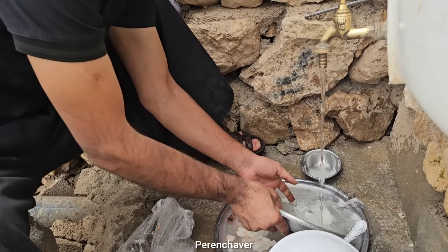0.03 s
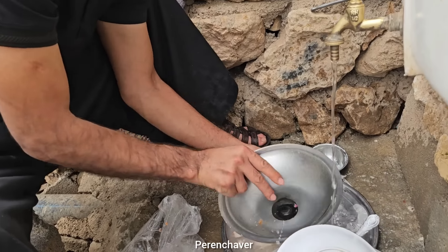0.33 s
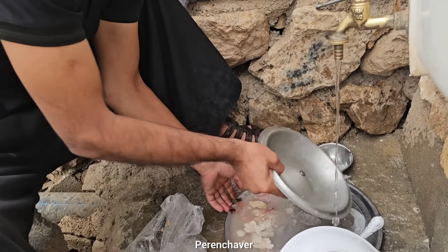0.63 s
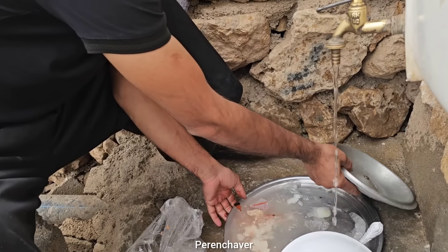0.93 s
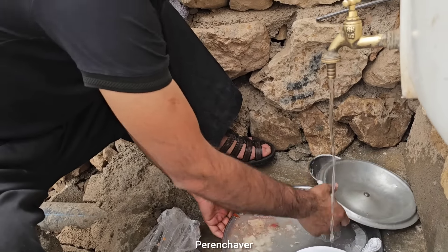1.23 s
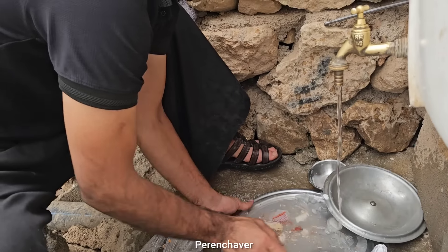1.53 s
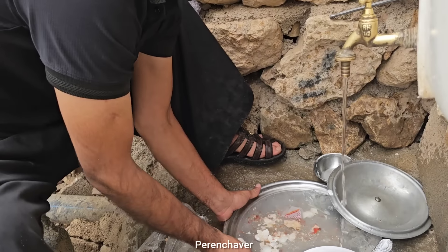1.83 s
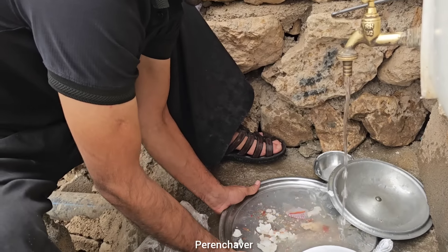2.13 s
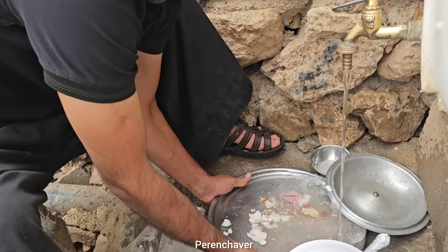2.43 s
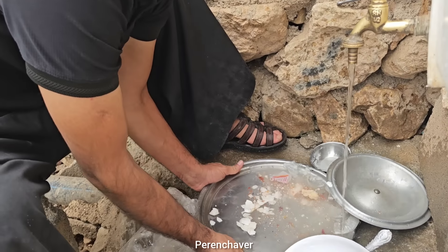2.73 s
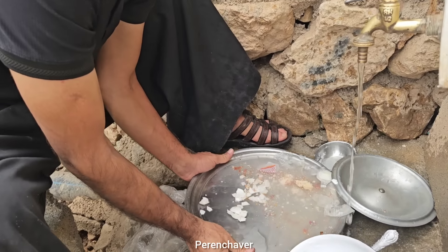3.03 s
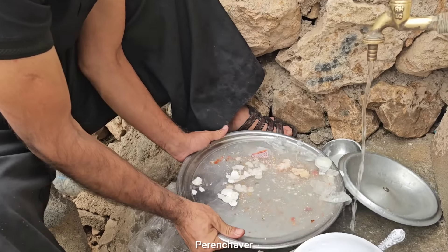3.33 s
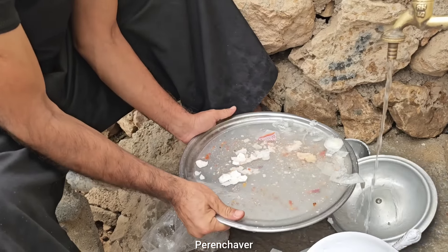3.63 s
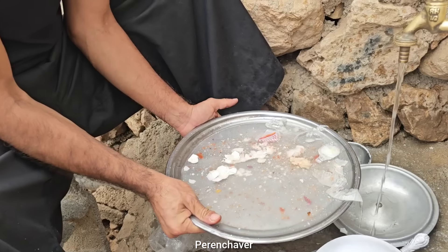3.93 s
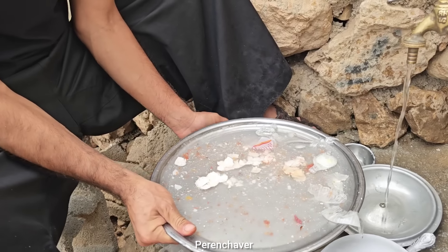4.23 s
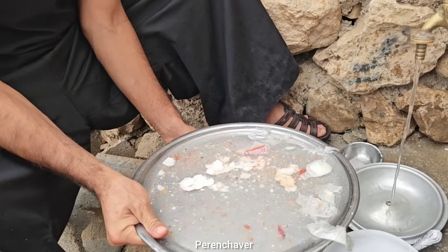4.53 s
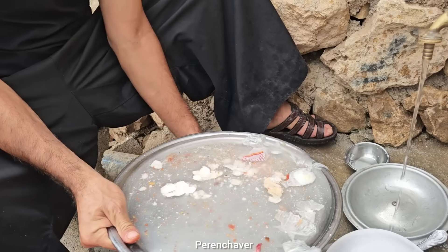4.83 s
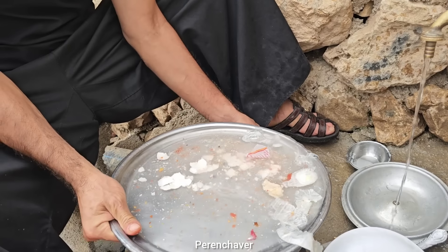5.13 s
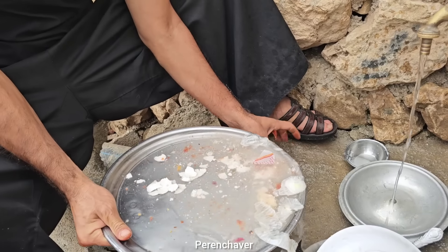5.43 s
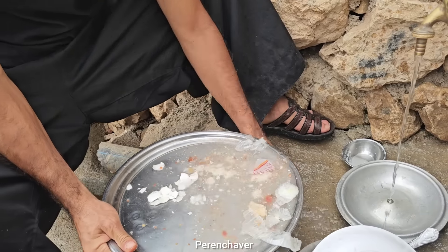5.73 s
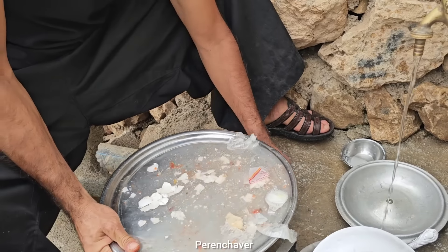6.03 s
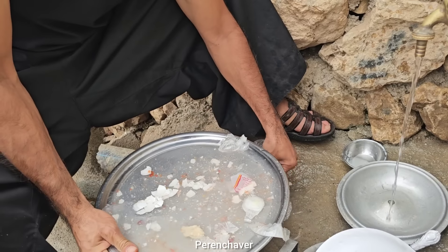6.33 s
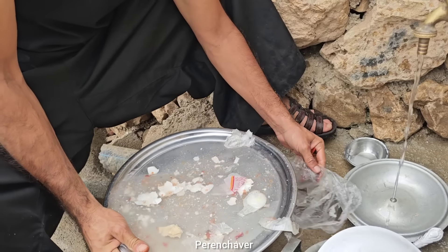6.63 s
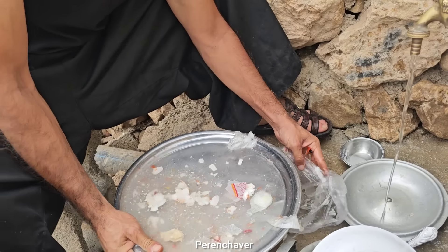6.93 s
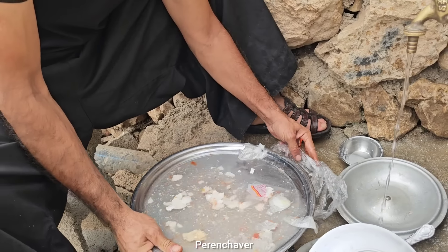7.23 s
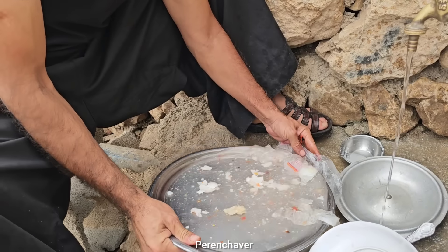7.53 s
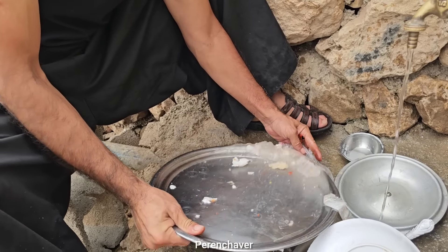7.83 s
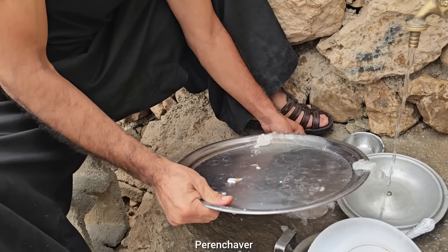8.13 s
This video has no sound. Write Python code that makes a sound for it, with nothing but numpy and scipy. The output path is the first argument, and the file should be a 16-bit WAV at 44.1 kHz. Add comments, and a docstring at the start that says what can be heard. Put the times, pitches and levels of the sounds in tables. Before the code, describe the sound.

Water sloshes and gurgles in a steel bowl swilled by hand. The bowl clatters against a basin, its wet rim is briefly rubbed, then it is set down with a loud ringing clank and dragged over gritty concrete. A tap dribbles and runs in a thin splattering stream, with scattered drops and a few dull plastic thuds. The sound is close and outdoors, with a short echo from stone walls.

```python
"""Rinsing a steel bowl outdoors

Water sloshes and bubbles in a steel bowl swilled by hand. The bowl rings as it knocks against a basin,
sings as its wet rim is rubbed, and is set down and dragged over gritty concrete. Drops fall, the tap
dribbles and runs in a thin splattering stream, and a plastic vessel is bumped with a dull thud.
Stone walls close by add a short echo, over a faint outdoor rumble."""
import sys
import numpy as np
from scipy import signal
from scipy.fft import irfft
from scipy.io import wavfile
from scipy.ndimage import uniform_filter1d

SR = 44100
rng = np.random.default_rng(int(sys.argv[2]) if len(sys.argv) > 2 else 0)


def generate_wav(signal):
    """Clip the signal to [-1, 1] and save it as 16-bit WAV at the path in sys.argv[1]."""
    frames = np.transpose(np.atleast_2d(signal))
    scaled = np.clip(frames, -1, 1) * 32767
    pcm = np.round(scaled).astype(np.int16)
    wavfile.write(sys.argv[1], SR, pcm)


N = 360738
TIME = np.arange(N) / SR

# how much louder the left side is: (frequency [Hz], left minus right [dB])
SIDE_BALANCE = [(200, -0.5), (1300, 1), (2000, 3), (3000, -5.5), (4200, -8.5), (5500, 3.5), (7500, 5.5),
                (8800, 15.5), (11000, 2.5), (13000, 9), (16000, 11.5)]
# how far the two sides fall out of step: (frequency [Hz], typical phase shift [radians])
SIDE_PHASE = [(100, .04), (500, .17), (1300, .5), (3000, 1.1), (15000, 1.4)]
# tone of the outdoor air: (frequency [Hz], level [dB])
AIR_TONE = [(20, -16), (48, 5), (125, -2.5), (200, -11), (400, -18), (600, -25.5), (1300, -18), (2100, -23),
            (8000, -37), (16000, -37)]
# rumbles as the body and the basin shift: (time [s], hold [s], level [dB])
SHIFTS = [(1.0, 0.18, -44), (3.27, 0.2303, -42.5), (3.9, 0.026, -48.5)]
# bumps on the plastic vessel: (time [s], level [dB], pitch [factor])
BUMPS = [(0.948, -28, 0.44), (1.235, -31, 1.14), (2.665, -38.5, 0.54), (2.696, -28, 1.3),
         (2.817, -36, 1.44), (2.957, -32.5, 0.92), (3.09, -39, 0.95), (7.241, -38.5, 1.2465),
         (7.597, -28, 0.99), (7.723, -33, 0.97), (7.769, -40, 1.01)]
# its modes, the tones it rings at: (pitch [Hz], level [dB], t60 [s]); t60 is the time to fade by 60 dB
PLASTIC_MODES = [(265.5, -4, 0.078), (396, -7, 0.08), (554, -0.5, 0.034), (682.7, 7.5, 0.082),
                 (823, -3.5, 0.072), (1025, 6, 0.04), (1242, -3, 0.057)]
# drops on wet metal: (time [s], level [dB], pitch that the chirp sweeps through [Hz])
DROPS = [(0.244, -40, 4070), (0.385, -40.5, 2670), (.533, -37, 2640), (0.638, -40.5, 3170),
         (1.634, -29.5, 2950), (1.75, -34, 2860), (1.857, -33, 1180), (2.071, -34.5, 3163),
         (4.316, -45, 2266), (4.465, -36, 2160), (4.606, -47, 3690), (4.654, -41.5, 3050),
         (5.001, -31.5, 1780), (5.183, -39, 2880), (5.347, -47, 3010), (5.615, -38.5, 2730),
         (5.746, -49, 5450), (5.874, -35.5, 1960), (6.361, -41, 1910), (6.532, -39, 2980),
         (6.812, -48, 2360), (6.936, -43, 2710), (7.237, -31.5, 2054), (7.493, -28, 1684),
         (7.934, -35, 2350), (8.103, -44, 2970), (8.126, -41, 3200)]
# large air bubbles: (time [s], level [dB], pitch [Hz], t60 [s])
GLUGS = [(.405, -29, 1410, 0.037), (.668, -38, 302, 0.21), (1.83, -30, 1080, 0.0423),
         (2.106, -25, 694, 0.024), (7.132, -34.5, 195.8, 0.09)]
# runs of the tap: (time [s], hold [s], level [dB])
TAP_RUNS = [(4.15, .1, -61), (4.83, .65, -48.3), (5.5, 1.38, -45.5), (7.28, .17, -51), (7.62, .55, -41.7)]
# tone of the stream: (frequency [Hz], level [dB])
STREAM_TONE = [(150, -8), (300, -7.5), (600, -10), (950, -13.5), (1350, -5), (2300, -8.5), (3500, 0),
               (4700, -3.5), (6000, -11), (9000, -15.5), (15500, -18.5)]
# sloshes in the bowl: (time [s], time to fade by 20 dB [s], gurgle [dB], hum of the bowl's wall [dB])
SLOSHES = [(-.02, 0.38, -34, -32), (0.437, 0.22, -40, -61), (1.221, .5, -42, -34.5),
           (1.537, 1.38, -43, -58), (1.796, 0.4, -39, -58), (2.0, 1.14, -40.5, -74.5),
           (2.3, 0.293, -37.5, -39), (2.8, 0.4, -47.5, -74), (3.275, 0.13, -38, -53)]
# gentle lapping between sloshes: (time [s], hold [s], level [dB])
LAPPING = (0, 4, -52.5)
# tone of the swilled water: (frequency [Hz], level [dB])
SWILL_TONE = [(100, -21), (250, -3), (550, 3.5), (800, -2), (1400, 3), (2300, -6), (4000, -6.5),
              (6000, -20.5), (9000, -27), (15500, -25.5)]
# places to strike the bowl, by name: (favoured pitch [Hz], its boost [dB], pitch bend by water [share])
PLACES = {"wall": (1300, 1.2, 0.0025), "flank": (1180, 7.6, .016), "foot": (770, 12, 0.0013),
          "base": (1800, 9.1, .003), "rim": (3050, 4, 0.0027)}
# the bowl's modes: (pitch [Hz], level [dB], t60 [s], left minus right [dB], places that wake it fully)
BOWL_MODES = [(673, -13, .2, 1, "wall foot"), (943, 1, .24, 7, "wall foot base"), (972, 0, .35, 3, "flank"),
              (1098, -15, .35, 2, "rim"), (1238, -8, .22, 1, "wall flank"), (1590, -16, .35, 1, "base rim"),
              (1707, -10, .32, 2, "wall base rim"), (1772, -17, .16, 2, "base flank"),
              (1900, -9, .2, 2, "wall"), (2285, -14, .25, -2, "base"),
              (2385, -15, .4, -3, "wall flank base rim"), (2455, -13, .45, -2, "base rim"),
              (2492, -3, .25, -2, "foot"), (2875, -11, .17, -7, "wall foot rim"),
              (3068, -7, .19, -6, "wall flank foot rim"), (3745, -12, .25, -4, "wall rim"),
              (3940, -11, .18, -7, "wall"), (4194, -17, .35, -4, "flank foot base"),
              (4622, -14, .2, -2, "wall rim"), (4945, -14, .17, 0, "wall"), (5650, -17, .2, 8, "wall foot"),
              (5850, -16, .2, 6, "foot"), (6660, -19, .2, 5, "foot rim"),
              (7720, -19, .13, 7, "wall foot rim")]
# clatter, the crowd of weak, short modes in bowl and basin: (frequency [Hz], level [dB])
CLATTER_TONE = [(60, -24), (150, -15), (300, -4.5), (550, -3.5), (950, 4.5), (1350, 4.5), (1750, 4.5),
                (1950, -7.5), (2200, -4), (2430, 3.5), (2680, -10.5), (3030, 4), (3400, -3.5), (3900, 1),
                (4600, -8), (5250, -10.5), (9000, -14), (16000, -16.5)]
# how long undamped clatter lasts: (frequency [Hz], t60 [s])
CLATTER_T60 = [(100, 0.71), (900, 0.2), (4000, 0.17), (15000, 0.077)]
# modes that ring on while the bowl stands free, and a ring of the basin under the stream: (time [s], end [s],
# pitch [Hz], level [dB], t60 [s])
LINGERING_MODES = [(3.478, 3.915, 431, -26.5, 1.4), (4.33, 5.0, 1098, -60, 2.5), (5.5, 5.9, 1200, -61, 3),
                   (6.55, 6.78, 4716, -51.5, 3)]
# the rub round the wet rim: (time [s], rise [s], time to fade by 20 dB [s])
RUB = (2.34, .15, .36)
# tones of the rubbed rim: (pitch [Hz], level [dB])
RUB_MODES = [(1350, -2), (1600, -2), (1700, -1), (1970, -5), (3050, -10), (3240, -4), (4130, -8),
             (5360, -13)]
# strokes over grit: (time [s], hold [s], low grind before trim [dB], high rasp before trim [dB], place)
DRAGS = [(1.04, 0.025, -33.5, -37, "wall"), (1.209, 0.17, -33, -34, "flank"),
         (3.52, 0.27, -35, -49.5, "base"), (3.897, 0.042, -34.5, -29, "rim")]
# blows on the bowl: (time [s], level [dB], treble tilt [dB per octave], ring over clatter [dB],
# damping by the hand [factor on the modes' t60], rattle [s], place)
KNOCKS = [(0.948, -20.5, 7, 0, 0.44, .003, "wall"), (.986, -14, -1, -3.5, 0.83, .0015, "wall"),
          (1.011, -20.5, 3.5, 2.5, 1, 0.0026, "wall"), (1.029, -23.5, -3.5, -4, 1, 0.0046, "wall"),
          (1.156, -25.5, -4, 2, 0.18, 0.0026, "wall"), (1.215, -25.5, -1, -9, 0.47, 0.0089, "flank"),
          (1.242, -18, -1.5, 7, 0.26, 0.0023, "flank"), (1.289, -22.5, -1.5, -12, 0.36, 0.0029, "flank"),
          (1.302, -24.5, -3.5, 8, 0.92, 0.001, "flank"), (1.361, -29, -1, -11, 0.63, 0.0015, "flank"),
          (2.316, -38, 3.5, 5, 0.18, .003, "wall"), (2.474, -35, 1, -8, 0.53, 0.0023, "base"),
          (3.295, -39, 9, -1, .8, 0.0037, "rim"), (3.398, -27, -6.5, -2.5, 1, 0.00035, "foot"),
          (3.425, -27.5, 6, -15, 0.71, 0.0098, "wall"), (3.438, -17.5, -5, 3, 0.2, .0026, "base"),
          (3.441, -15, 2, -5, 0.81, 0.0051, "base"), (3.4773, -9, -0.5, 4.5, 0.6, 0.0007, "foot"),
          (3.5164, -19.5, -3.5, -9, 0.17, 0.0018, "base"), (3.585, -32, -4.5, -11, 0.33, 0.0012, "base"),
          (3.631, -31.5, -6, -13, .3, 0.00068, "base"), (3.677, -25.5, -1.5, 0, 0.54, .0097, "rim"),
          (3.723, -23, 2, 3, 0.85, 0.0074, "rim"), (3.793, -27, 1, 2.5, 0.97, 0.0056, "rim"),
          (3.916, -28, 1.5, 1, 0.93, 0.01, "rim"), (3.947, -21, 8, 6.5, 0.61, 0.0064, "rim"),
          (4.096, -39.5, -1, -4.5, 0.68, 0.0049, "flank"), (7.599, -38, 7, 4, 0.23, .002, "rim"),
          (7.618, -44, 10, 8, .25, 0.0022, "wall")]


def amp(db):
    """Turns decibels into a gain."""
    return 10 ** (np.asarray(db) / 20)


def unit_level(x):
    """Scales a sound to an average power of one."""
    return x / np.sqrt(np.mean(x ** 2) + 1e-20)


def look_up(points, hz):
    """Joins a table's points by straight lines on a log-frequency axis."""
    table_hz, value = np.transpose(points)
    return np.interp(np.log(hz + 1), np.log(table_hz + 1), value)


def add(mix, start, sound):
    """Mixes a sound in, start seconds from the beginning."""
    part = mix[..., max(round(start * SR), 0):][..., :sound.shape[-1]]
    part += sound[..., :part.shape[-1]]


def coloured(x, tone):
    """Gives a sound a tone. Nothing rings ahead of a hit, so hits stay sharp."""
    log_gain = np.log(amp(look_up(tone, abs(np.fft.fftfreq(2048, 1 / SR)))))
    taps = np.fft.ifft(np.exp(np.conj(signal.hilbert(log_gain)))).real[:1024]
    return signal.oaconvolve(x, taps.reshape((1,) * (x.ndim - 1) + (-1,)), axes=-1)[..., :x.shape[-1]]


def band(x, lo_hz, hi_hz, order=3):
    """Keeps what lies between two frequencies."""
    sections = signal.butter(order, [lo_hz, min(hi_hz, .49 * SR)], "band", fs=SR, output="sos")
    return signal.sosfilt(sections, x)


def swell(start, hold, db, rise_s, fade_s):
    """A gain that rises, holds, then falls by 20 dB in every fade_s."""
    t = TIME - start
    return np.clip(t / rise_s, 0, 1) * amp(db - 20 * np.maximum(t - rise_s - hold, 0) / fade_s)


def follow(x, gain, size=2600):
    """Evens out loudness over size samples, then makes it follow gain. The fine grain stays."""
    power = uniform_filter1d(np.mean(np.atleast_2d(x) ** 2, 0), size)
    return x / np.sqrt(abs(power) + 1e-4 * power.mean()) * gain


def wander(size):
    """A smooth random curve that changes over about size samples."""
    return unit_level(uniform_filter1d(uniform_filter1d(rng.standard_normal(N), size), size // 2))


def clicks(per_s, spread_db):
    """Random clicks, a few much larger than the rest."""
    hits = rng.random(N) < per_s / SR
    return hits * amp(spread_db * np.minimum(rng.exponential(1, N), 4)) * rng.choice([-1, 1], N)


def resonate(x, hz, width_hz):
    """Makes a sound ring at a pitch that follows the curve hz."""
    turn = np.exp(2j * np.pi * np.cumsum(hz) / SR)
    pole = np.exp(-np.pi * width_hz / SR)
    return unit_level((turn * signal.lfilter([1], np.poly([pole, pole]), x / turn)).real)


def stereo(x, size=512):
    """Shades and delays the treble differently left and right; a larger size scatters it more finely."""
    hz = np.fft.rfftfreq(size, 1 / SR)
    phase = unit_level(uniform_filter1d(rng.standard_normal(len(hz)), size=5)) * look_up(SIDE_PHASE, hz)
    pair = amp(np.outer([.5, -.5], look_up(SIDE_BALANCE, hz))) * np.exp(1j * np.outer([1, -1], phase))
    taps = np.roll(irfft(pair / np.sqrt(np.mean(abs(pair) ** 2, 0))), size // 2, axis=1)
    return signal.oaconvolve(x[None], taps, axes=1)[:, size // 2:size // 2 + len(x)]


def outdoor_air(level_db=-55):
    """A faint rumble: both sides share the bass, but differ in the treble."""
    each_side = coloured(rng.standard_normal((2, N)), [(100, -16), (500, -10), (2000, 2)])
    return amp(level_db) * unit_level(coloured(rng.standard_normal(N) + each_side, AIR_TONE))


def wall_echo(x, echo_db=-13, t60=0.39):
    """Rough stone close by scatters a short echo."""
    t = np.arange(SR // 3) / SR
    echoes = rng.standard_normal((2, len(t))) * (rng.random((2, len(t))) < .05)
    echoes *= amp(-60 * t / t60) * (t > .004)
    echoes = coloured(echoes / np.linalg.norm(echoes[0]), [(3000, 0.5), (14000, -16)])
    return x + amp(echo_db) * signal.oaconvolve(x, echoes, axes=1)[:, :N]


def shifting():
    """The body and the basin shift with a dull rumble, alike on both sides."""
    gain = sum(swell(*row, rise_s=0.083, fade_s=0.15) for row in SHIFTS)
    return follow(band(rng.standard_normal(N), 67, 130, order=2), gain)


def plastic_bumps(scuff=0.58):
    """Soft blows ring the few quickly dying modes of the plastic wall."""
    out, t = np.zeros(N), np.arange(SR // 5) / SR
    for start, db, pitch in BUMPS:
        ring = sum(amp(mode_db - 60 * t / t60) * np.sin(2 * np.pi * (hz * pitch * t + rng.random()))
                   for hz, mode_db, t60 in PLASTIC_MODES)
        noise = unit_level(band(rng.standard_normal(len(t)), 230, 890, order=1))
        ring += scuff * noise * np.exp(-t / 0.045)
        ring *= 1 - np.exp(-t / 0.0019)
        add(out, start, amp(db) * ring / np.std(ring[:600]))
    return stereo(out)


def tap_dribble(level_db=-47, per_s=14, spread_db=-3.5, splat_s=0.0034, until_s=6.5):
    """The tap dribbles: small dry ticks at a loosely even pace."""
    out, t = np.zeros(N), np.arange(1200) / SR
    for k, (late, size, pitch) in enumerate(rng.standard_normal((120, 3))):
        start = (k + 0.54 * late) / per_s
        tick = unit_level(band(rng.standard_normal(len(t)), 3100 * np.exp(0.2 * pitch), 9000, order=1))
        add(out, start, (start < until_s) * amp(level_db + spread_db * size) * np.exp(-t / splat_s) * tick)
    return stereo(out)


def drops(length_s=0.01, rise=1.6, fizz=0.3):
    """A drop spreads on the metal in a few milliseconds: a rising chirp with a fizz of spray."""
    out, t = np.zeros(N), np.arange(1500) / SR
    shape = (1 - np.exp(-t / 0.00025)) * (np.exp(-(t / length_s) ** 4) + 0.3218 * np.exp(-t / 0.0053))
    for start, db, hz in DROPS:
        sweep_hz = 0.91 * hz * (1 + rise * np.minimum(t / length_s, 1))
        chirp = np.sin(2 * np.pi * np.cumsum(sweep_hz) / SR)
        spray = unit_level(band(rng.standard_normal(len(t)), hz * 0.83, hz * 3, order=1))
        add(out, start, amp(db) * shape * (chirp + fizz * spray))
    return out


def glugs():
    """Each large air bubble rings with one slightly rising tone."""
    out, t = np.zeros(N), np.arange(SR // 4) / SR
    for start, db, hz, t60 in GLUGS:
        shape = amp(db - 60 * t / t60) * (1 - np.exp(-t / 0.0006064))
        add(out, start, shape * np.sin(2 * np.pi * hz * t * (1 + 0.046 * t / t60)))
    return out


def bubbles(lo_hz, hi_hz, per_s, cycles, spread_db, sizes=30):
    """Bubbles of many sizes; each rings briefly and rises in pitch as it surfaces."""
    out = np.zeros(N)
    for hz in np.geomspace(lo_hz, hi_hz, sizes):
        age = np.arange(0, 5, hz / (cycles * SR))  # counted in decay times
        ping = np.exp(-age) * (1 - np.exp(-8 * age))
        ping *= np.sin(2 * np.pi * cycles * (age + 0.018 * age ** 2))
        out += signal.oaconvolve(clicks(per_s / sizes, spread_db), ping)[:N] * hz
    return unit_level(out)


def tap_stream(flutter_db=2.0, wash=0.67, spatter=0.23, plink_db=-16):
    """The thin jet breaks into drops that splatter unevenly; strays spit or plink in the puddle."""
    splatter = bubbles(243.5, 16200, per_s=6000, cycles=2.1, spread_db=4.5)
    splatter += wash * rng.standard_normal(N)
    splatter = stereo(coloured(splatter, STREAM_TONE), size=4096)
    splatter = unit_level(splatter * amp(flutter_db * wander(500)))
    bursts = signal.oaconvolve(abs(clicks(per_s=14, spread_db=5)), signal.windows.hann(400))[:N]
    strays = stereo(unit_level(band(bursts * rng.standard_normal(N), 3400, 7100, order=1)))
    plinks = stereo(bubbles(1220.9, 4824, per_s=70, cycles=8.4, spread_db=6.5))
    flow = np.max([swell(*row, rise_s=0.023, fade_s=0.55) for row in TAP_RUNS], axis=0)
    return follow(splatter + spatter * strays + amp(plink_db) * plinks, flow, size=9000)


def swill(rise_s=0.019, hum_hz=560, hum_width_hz=95, overtone_db=-11, rush=1.7, lap_db=3.0):
    """Water laps round the bowl in uneven bursts, gurgling and spitting, and makes its wall hum."""
    sloshes = [swell(start, 0, db, rise_s, fade) for start, fade, db, _ in SLOSHES]
    gurgle_gain = np.max([swell(*LAPPING, rise_s, fade_s=0.0985)] + sloshes, axis=0)
    hum_gain = sum(swell(start, 0, db, rise_s, fade) for start, fade, _, db in SLOSHES)
    spray_gain = amp(-45) * (gurgle_gain / amp(-41.5)) ** 0.73  # swings less than the gurgle
    laps = amp(lap_db * wander(600))
    large = bubbles(162.5, 2250, per_s=800, cycles=6.549, spread_db=2.0)
    gurgle = coloured(laps * (large + rush * rng.standard_normal(N)), SWILL_TONE)
    small = bubbles(2110, 16800, per_s=1500, cycles=2.3, spread_db=4.5)
    spray = coloured(laps * (small + .5 * rng.standard_normal(N)), SWILL_TONE)
    pats = clicks(per_s=1300, spread_db=4.0)
    wall_hz = hum_hz * (1 + 0.043 * wander(6000))
    hum = resonate(pats, wall_hz, hum_width_hz)
    hum += amp(overtone_db) * resonate(pats, wall_hz * 1.6, hum_width_hz)
    water = follow(band(gurgle, 140, 2300), gurgle_gain, size=4400)
    water += follow(band(spray, 2700, 14000), spray_gain, size=4400)
    return stereo(water + follow(hum, hum_gain, size=4400), size=1024)


def bowl_modes(place, damping, waver_s=.03, node_db=-14, scatter_db=2):
    """The bowl's clear ring wavers as water moves. A mode struck near a node (still spot) is weaker."""
    t = np.arange(SR * 3 // 4) / SR
    modes = np.zeros((2, len(t)))
    sides = np.array([[1], [-1]])
    _, _, bend = PLACES[place]
    for hz, db, t60, pan_db, woken_at in BOWL_MODES:
        db = db + node_db * (place not in woken_at) + scatter_db * rng.standard_normal()
        waver = np.interp(t / waver_s, np.arange(100), rng.standard_normal(100))
        drift = bend * min(hz / 1500, 1) * waver
        phase = np.pi * rng.integers(0, 2) + .7 * rng.choice([-1, 1]) * look_up(SIDE_PHASE, hz) * sides
        gain = amp(db - 60 * t / (t60 * damping) + sides * pan_db / 2)
        modes += gain * np.sin(2 * np.pi * hz * np.cumsum(1 + drift) / SR + phase)
    return modes / np.std(modes[:, :SR // 50])


def bowl_clatter(damping):
    """One click wakes so many weak modes that they blur into noise. The high ones die first."""
    t = np.arange(SR * 3 // 4) / SR
    hz, frame_s, spectrum = signal.stft(rng.standard_normal(len(t)), SR, nperseg=256)
    t60 = look_up(CLATTER_T60, hz)[:, None] * np.sqrt(damping)
    clatter = signal.istft(spectrum * amp(-60 * frame_s / t60), SR, nperseg=256)[1][:len(t)]
    clatter = stereo(coloured(clatter * (1 + 1.2 * np.exp(-t / 0.011)), CLATTER_TONE))
    return clatter / np.std(clatter[:, :SR // 50])


def standing_hum(stop_s=0.00896):
    """Once set down the bowl hums, and water sets its higher modes singing, and the running stream sets the
    basin ringing, until they are damped."""
    out = np.zeros(N)
    for start, end, hz, db, t60 in LINGERING_MODES:
        t = np.maximum(TIME - start, 0)
        stop = np.exp(-np.maximum(TIME - end, 0) / stop_s)
        out += amp(db - 60 * t / t60) * stop * np.sin(2 * np.pi * hz * t)
    return stereo(out)


def rim_rub(level_db=-32, grit=0.76, width_hz=60):
    """Sticking and slipping on the wet rim makes a few drifting tones sing, while grit rasps."""
    slips = clicks(per_s=450, spread_db=3.2)
    drift = 1 + 0.012 * wander(4000)
    sing = stereo(sum(amp(db) * resonate(slips, hz * drift, width_hz) for hz, db in RUB_MODES))
    clatter = signal.oaconvolve(slips[None], bowl_clatter(damping=.5), axes=1)[:, :N]
    rasp = unit_level(band(clatter, 6000, 15000, order=1))
    start, rise_s, fade_s = RUB
    return follow(sing + grit * rasp, swell(start, 0, level_db, rise_s, fade_s), size=9000)


def bowl_drags(trim_db=-2.2, ring_db=1):
    """Grains of grit catch the bowl and ring it, while the water inside bends its pitch."""
    out = np.zeros((2, N))
    for start, hold, grind_db, rasp_db, place in DRAGS:
        grains = clicks(per_s=250, spread_db=3.5)
        one_grain = bowl_clatter(damping=0.37) + amp(ring_db) * bowl_modes(place, damping=0.51)
        ring = signal.oaconvolve(grains[None], one_grain, axes=1)[:, :N]
        _, _, bend = PLACES[place]
        bent_time = np.cumsum(1 + bend * wander(3000)) / SR
        ring = np.array([np.interp(bent_time, TIME, side) for side in ring])
        stroke = swell(start, hold, trim_db, rise_s=0.02219, fade_s=0.14)
        out += follow(band(ring, 800, 1800), amp(grind_db) * stroke)
        out += follow(band(ring, 2750, 16000), amp(rasp_db) * stroke)
    return out


def bowl_knocks(chatter=0.25, glance_s=0.016, boost_width=1.2):
    """Each blow is a hit and a chatter of the rim; the longer the chatter, the slower the ring builds."""
    out, t = np.zeros((2, N)), np.arange(SR * 3 // 4) / SR
    for start, db, tilt_db, ring_db, damping, rattle_s, place in KNOCKS:
        age = t / rattle_s
        contacts = rng.standard_normal(len(t)) * (rng.random(len(t)) < .02)
        force = contacts * chatter * 2 * age * np.exp(-age)
        force[0] = np.exp(-rattle_s / glance_s)  # the first hit
        attack = slice(SR // 60 + round(rattle_s * SR))
        clatter = signal.fftconvolve(bowl_clatter(damping), force[None], axes=1)[:, :len(t)]
        ring = amp(ring_db) * bowl_modes(place, damping) * (1 - np.exp(-age))
        sound = clatter / np.std(clatter[:, attack]) + ring
        hz, boost_db, _ = PLACES[place]
        sound = coloured(sound, [(hz / boost_width, 0), (hz, boost_db), (hz * boost_width, 0)])
        sound = coloured(sound, [(500, -tilt_db), (4000, 2 * tilt_db)])
        add(out, start, amp(db) * sound / np.std(sound[:, attack]))
    return out


def scene():
    """Bowl, water and plastic echo off the walls; the standing hum and the rumbles do not."""
    bowl = bowl_knocks() + bowl_drags() + rim_rub()
    water = swill() + tap_dribble() + tap_stream() + stereo(drops() + glugs())
    return wall_echo(bowl + water + plastic_bumps()) + standing_hum() + shifting() + outdoor_air()


def record(dry):
    """Rounds off the loudest peaks, then cuts the treble above 16200 Hz."""
    rounded = dry / (1 + dry ** 6) ** (1 / 6)
    low_pass = signal.firwin(511, 16200, window=("kaiser", 9), fs=SR)
    return signal.oaconvolve(rounded, low_pass[None], "same")


dry = scene()
out = record(dry)
generate_wav(out)
```